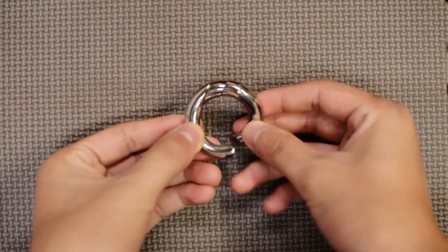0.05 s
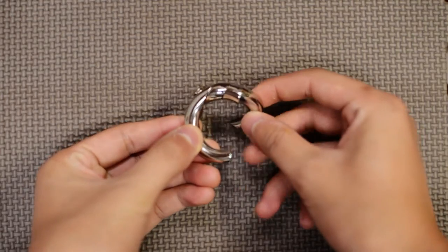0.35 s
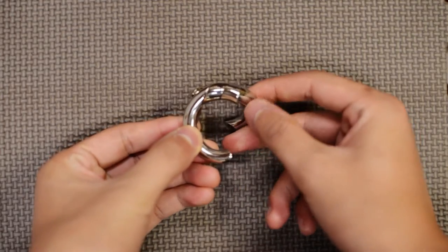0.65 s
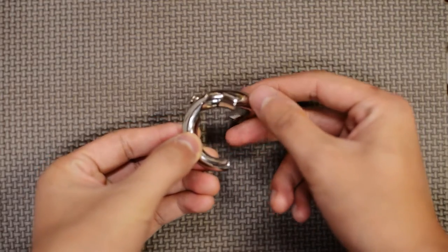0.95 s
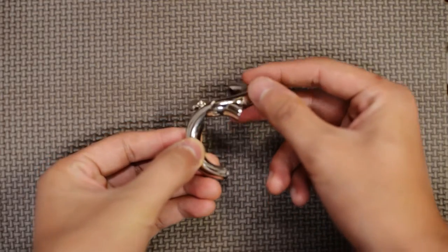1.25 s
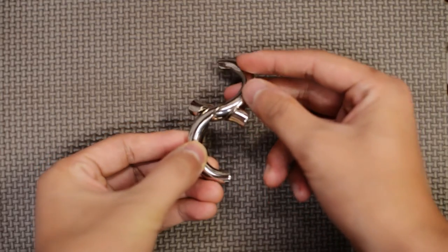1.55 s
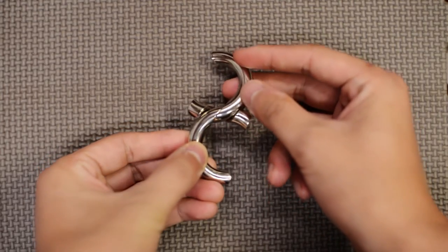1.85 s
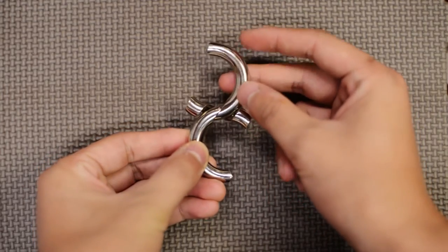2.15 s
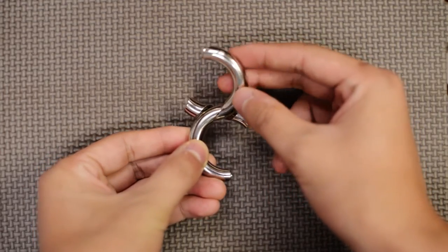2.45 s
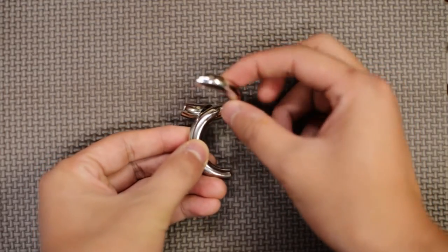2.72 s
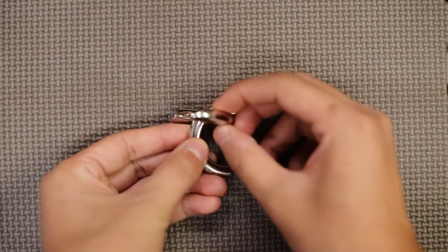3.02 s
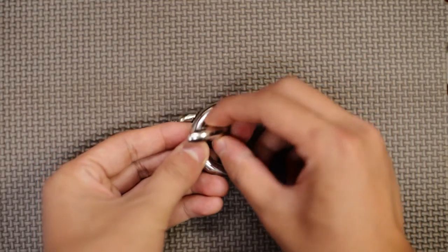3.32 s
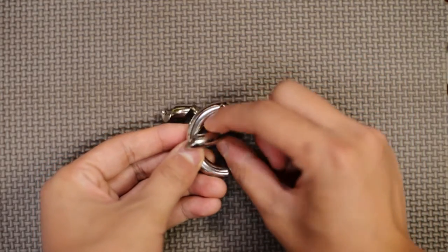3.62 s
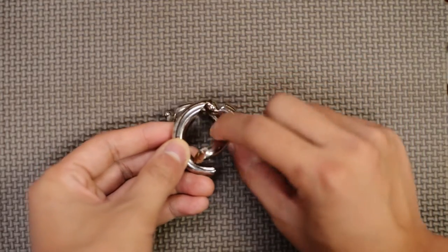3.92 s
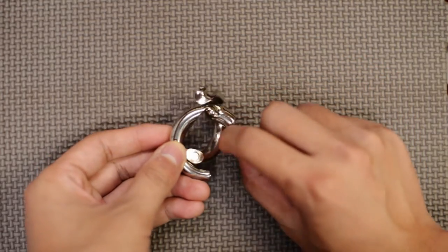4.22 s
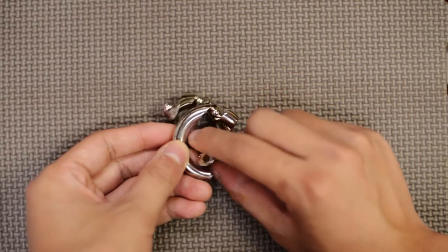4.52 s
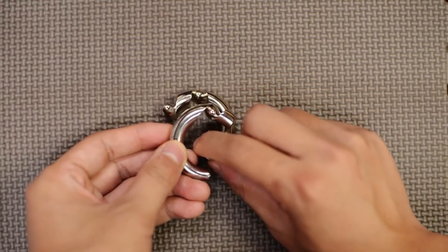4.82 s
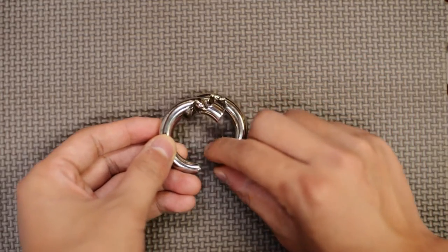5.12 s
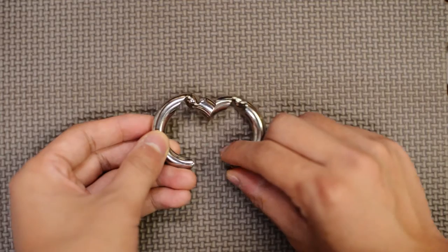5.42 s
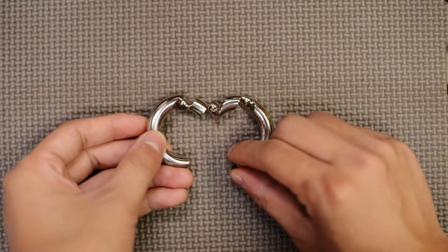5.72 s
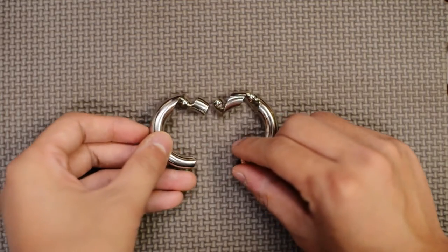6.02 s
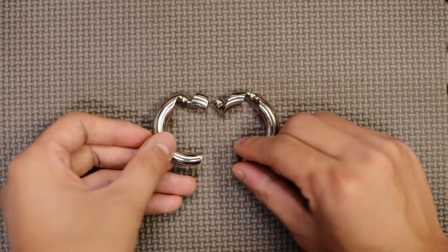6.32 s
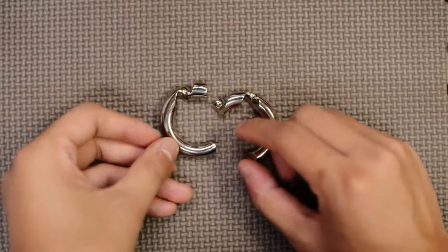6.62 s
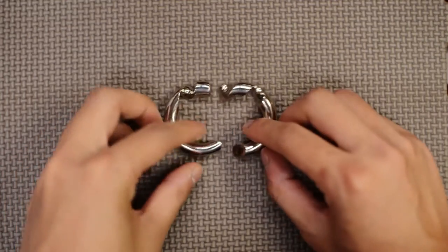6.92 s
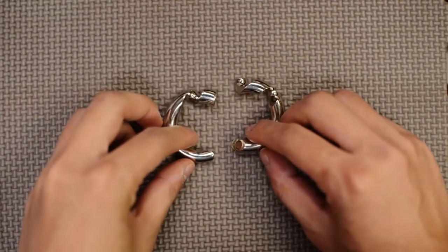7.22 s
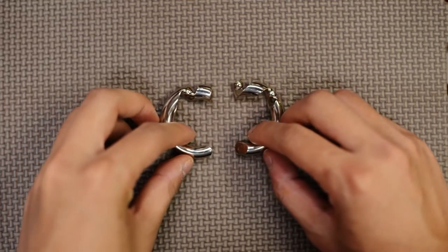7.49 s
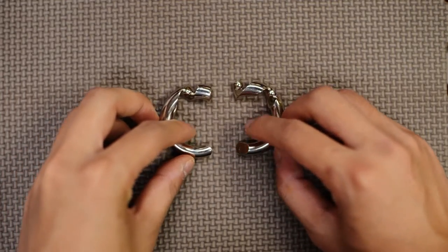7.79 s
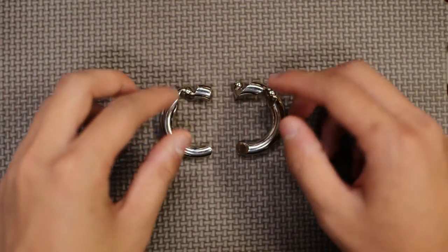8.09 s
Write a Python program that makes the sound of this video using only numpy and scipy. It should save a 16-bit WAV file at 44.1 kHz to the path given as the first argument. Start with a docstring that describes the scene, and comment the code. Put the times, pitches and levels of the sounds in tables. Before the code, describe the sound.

Two small steel puzzle pieces are twisted apart by hand, close to the microphone in a small quiet room. In the first half second, fingers brush the metal with a faint scrape and tiny dry ticks. A soft bump comes at 0.8 seconds, then a run of short clicks from 1 to 1.2. After a pause there is one click at 2.6 and a brief gritty scrape at 3. From 3.9 to 4.6 the pieces come loose with louder clinks, rattles, scrapes and short high rings, along with light table bumps. A faint clink follows at 5.3 and a soft knock at 5.8. Around 6.5 the pieces are set on a mat with a quick cluster of padded thuds, the loudest moment. Hands rub softly until about 7.2, and fingers slide off at 8.3. An even hiss and a faint high whine continue throughout.

```python
"""A small, quiet room, close to two hands twisting a pair of curved steel puzzle pieces apart.
Pinched together, the pieces give short dull clicks and scrapes; as they come loose they rattle and ring.
They are set down on a mat with soft thuds that sway the table, and the fingers slide off.
Under it all lie an even hiss and a faint whine."""
import sys
import numpy as np
from scipy import signal
from scipy.fft import rfft, irfft
from scipy.io import wavfile
from scipy.ndimage import uniform_filter1d

SR = 44100
rng = np.random.default_rng(int(sys.argv[2]) if len(sys.argv) > 2 else 0)


def persist_wave(psi):
    """Save psi, clipped to +-1, as 16-bit WAV."""
    counts = np.round(np.clip(psi, -1, 1) * 32767).astype(np.int16)
    wavfile.write(sys.argv[1], SR, np.atleast_2d(counts).T)


N = 368235


# Steel hits: start_s, level_db, contact_s, base_t60_s, place (0 middle, 1 tip), sideways (0-1),
# rattle (0-1, how much the second piece joins in)
CLINKS = [ (0.267, -57, 0.007, 0.024, .1, 0.3, .6), (0.286, -50, 0.0035, .03, 0.36, 0.6, 0),
          (0.334, -50, .004, .019, .45, .55, .4), (.348, -49, 0.0048, 0.0099, .35, 0.6, .4),
          (0.424, -53.5, 0.0041, .016, 0.56, 0.6, 0), (0.821, -56, 0.0044, .015, .1, 0.1, 0.7),
          (1.0116, -52, 0.0046, 0.018, .1, .3, 0.4), (1.0167, -39, 0.0036, 0.044, 0.026, 0.35, 0.27),
          (1.068, -34, 0.0034, 0.028, 0.15, 0.34, 0.25), (1.148, -41.5, .0044, 0.011, 0.52, 0.4, 0.6),
          (1.202, -47, 0.005, 0.018, 0.36, 0.46, 0.2), (1.22, -51.5, 0.005, 0.048, 0.28, 0.44, .3),
          (2.619, -46, 0.0026, 0.031, 0.76, .08, .16), (2.98, -42, 0.002, 0.057, 0.81, 0.88, 0.5),
          (3.001, -50.5, 0.0078, 0.024, .35, .55, 0.1), (3.8549, -37, 0.0042, .032, 0.57, 0.23, 0.04),
          (3.986, -42, 0.0052, 0.058, .58, 0.03, 0.8), (4.128, -41.5, .0046, 0.048, 0.62, .42, 0.75),
          (4.152, -28.5, 0.0086, 0.039, 0.56, 0.65, 1.0), (4.246, -33.5, 0.0027, 0.056, 0.31, 0.5, 0.54),
          (4.267, -45.5, 0.0015, 0.28, 0.56, 0.76, 0.35), (4.416, -31.5, 0.0005, 0.16, 0.56, 0.98, 0.16),
          (4.5365, -46, 0.0035, 0.32, .97, 0.5, 0.13), (5.346, -50.5, 0.0061, 0.093, 0.38, 0.7, 0.86)]

def clinks(jolt_thud_db=-18.5, jolt_tap_db=-32):
    """Steel hits steel, and the hands pass a little of each jolt on to the table."""
    steel, jolts = np.zeros((2, N))
    for start_s, level_db, *contact in CLINKS:
        add(steel, start_s, blow(level_db, *contact))
        add(jolts, start_s, thud(level_db + jolt_thud_db, level_db + jolt_tap_db))
    return steel, jolts


# How a blow wakes each mode: base_db, then offsets tip_db, sideways_db, rattle_db, tick_db
MODE_DRIVE = [(8, -25.5, -6.5, 6, -9), (-10, 18, -3, 2.5, -15), (6, -3.5, -3.5, -5.5, -4),
              (-21.5, -7, 27.5, 5.5, -10), (-41.5, -2.5, 20.5, 23.5, -18)]

def blow(level_db, contact_s, t60_s, place, sideways, rattle, light_db=-46.5, pinch_hz=104):
    """Where and how the pieces meet sets the tone of a clink."""
    place, sideways, rattle = np.clip([place, sideways, rattle], .01, 1)
    pinch = np.exp(-t60_s / .068)  # a tight grip means a short ring and a raised pitch
    tick = pinch * np.clip((light_db - level_db) / 11, 0, 1)  # light, pinched blows turn dry
    mode_db = level_db + np.array(MODE_DRIVE) @ [1, place, sideways, rattle, tick]
    crack_db = level_db - 3.5 + 5.5 * sideways
    crack_db += 2 * np.log2(contact_s / .0049)  # longer chatter cracks louder
    return clink(contact_s, t60_s, pinch_hz * place * pinch, rattle, crack_db, mode_db)


# Bending modes of the steel: first_piece_hz, second_piece_hz
STEEL_MODES = [(2495, 2625), (4580, 4452), (7526, 7470), (8645, 8475), (14598, 14530)]
# Sustain of each mode: t60_factor
SUSTAIN = [1.28, 0.84, 1.26, 1.8, 3.4]

def clink(contact_s, t60_s, rise_hz, rattle, crack_db, mode_db, jitter_hz=170):
    """A few milliseconds of chatter pump up the modes of both pieces, which then ring out."""
    t = np.arange(SR // 2) / SR
    force = np.exp(-(t / contact_s) ** 2)
    out = crack(force, crack_db, mode_db[-1])
    push = force.copy()
    push[0] += .3 * force.sum()  # opening kick
    shares = np.array([1, rattle]) / np.hypot(1, rattle)
    piece_t60_s = t60_s * np.array([1, .7])  # the second piece is held more firmly
    for pair, sustain, db in zip(STEEL_MODES, SUSTAIN, mode_db):
        for hz, share, decay_s in zip(pair, shares, sustain * piece_t60_s):
            swell = signal.lfilter([1], [1, -amp(-60 / (decay_s * SR))], push)
            # tiny impacts blur the pitch while the pieces touch
            jitter = unit(uniform_filter1d(rng.standard_normal(len(t)), size=24))
            pitch_hz = hz + rise_hz + jitter_hz * force * jitter
            tone = np.sin(2 * np.pi * (np.cumsum(pitch_hz) / SR + rng.random()))
            out += amp(db) * share * unit(swell * tone, size=530)
    return out


# Tone of the attack: freq_hz, gain_db
CRACK_EQ = [(200, -15), (950, -16.5), (1250, -5), (1600, -9.5), (2000, 0.5), (2600, 3.5), (4000, -1),
            (6200, 3.5), (8400, -1.5), (9800, -9.5), (13000, -23), (16000, -21)]
# Slap from close surfaces: delay_s, gain_db
SLAPS = [(.0031, -9), (.0046, -9), (.0068, -10), (.0087, -9)]

def crack(force, level_db, top_mode_db, impacts_per_s=9000):
    """The chatter's noisy attack; a blow that wakes the top mode also cracks brighter."""
    chatter = impacts(impacts_per_s, len(force)) * force
    chatter[0] += 1.3  # first touch
    burst = chatter.copy()
    for delay_s, db in SLAPS:
        add(burst, delay_s, amp(db) * chatter)
    brightness = .45 * (top_mode_db - level_db + 18)
    tilt = [(1600, -1.3), (3000, -.3), (6000, -.26), (12000, 1)]
    eq = [(hz, db + brightness * read(tilt, hz)) for hz, db in CRACK_EQ]
    return amp(level_db) * unit(colour(burst, eq), size=530)


# Steel scraping steel: start_s, end_s, level_db, fade_db, slips_per_s, rise_hz
SCRAPES = [(0.076, 0.35, -68, 11, 1600, 130), (1.085, 1.19, -57, 7, 2100, 150),
           (2.977, 3.008, -34.5, 10, 640, -3), (4.164, 4.228, -38, 23, 2100, -60),
           (4.428, 4.538, -41.5, 8, 2500, 328)]
# Each mode in a scrape: gain_db, share_of_rise
SCRAPE_MODES = [(1.5, 0.43), (2, 0.9), (-1, 0.15), (-11, .1), (-15, .1)]
# Tone of the grit: freq_hz, gain_db
GRIT_EQ = [(200, -26), (1100, -21), (1800, 0), (2800, 3), (4200, 15), (6000, -7), (8000, -6), (10000, -22),
           (16000, -29)]

def scrapes(width_hz=50):
    """Small slips excite the modes; growing pressure stiffens the contact and bends their pitch."""
    out = np.zeros(N)
    for start_s, end_s, level_db, fade_db, slips_per_s, rise_hz in SCRAPES:
        progress = np.linspace(0, 1, int((end_s - start_s) * SR))
        slips = impacts(slips_per_s, len(progress))
        ring = sum(amp(db) * unit(resonate(slips, hz + share * rise_hz * progress, width_hz))
                   for (hz, _), (db, share) in zip(STEEL_MODES, SCRAPE_MODES))
        grit_db = -3 + 3.5 * np.log2(1500 / slips_per_s)  # fewer, coarser slips are grittier
        grit = amp(grit_db) * unit(colour(slips, GRIT_EQ))
        envelope = amp(level_db - fade_db * progress) * signal.windows.tukey(len(progress), .2)
        add(out, start_s, envelope * unit(unit(ring) + grit))
    return out


# Knocks on the mat: start_s, thud_db, tap_db
KNOCKS = [(0.815, -50, -51.5), (3.373, -49.5, -57.5), (3.868, -41.5, -48.5), (4.154, -39, -44),
          (5.7663, -42, -51), (6.428, -45, -49.5), (6.447, -61, -46), (6.454, -29.5, -36),
          (6.471, -31.5, -44), (6.503, -22.5, -33), (6.532, -40.5, -49), (7.099, -51, -61)]

def knocks():
    """The pieces bump the table through the mat."""
    out = np.zeros(N)
    for start_s, thud_db, tap_db in KNOCKS:
        add(out, start_s, thud(thud_db, tap_db))
    return out


# Body of the table: pitch_hz, gain_db, t60_s
TABLE_MODES = [(170.6, -1.5, 0.097), (196, 0, 0.077), (290, -3, 0.058), (330, -11.5, 0.049),
               (394, -25.5, 0.17), (650, -9, 0.019), (1270, -15, 0.024), (1560, -18, 0.046)]
# Tone of the padded tap: freq_hz, gain_db
TAP_EQ = [(70, -58), (150, -11), (400, -2), (750, -1.5), (980, -9.5), (1250, 4.5), (1560, -2),
          (1780, -11.5), (2350, -7), (2750, -17), (3400, -8), (5800, -16.5), (7000, -29.5), (16000, -30)]

def thud(thud_db, tap_db, attack_s=.00061, tap_s=.0033, settle_s=.022, low_cut_hz=138):
    """A padded tap, then the table swings; it radiates little below its lowest mode."""
    t = np.arange(SR // 4) / SR
    body = sum(amp(db - 60 * t / t60) * np.sin(2 * np.pi * hz * t) for hz, db, t60 in TABLE_MODES)
    onset = 1 - np.exp(-t / attack_s)
    press = np.exp(-(t / tap_s) ** 2) + amp(-19) * np.exp(-t / settle_s)
    tap = colour(rng.standard_normal(len(t)) * press * onset, TAP_EQ)
    knock = amp(tap_db) * unit(tap, size=530) - amp(thud_db) * unit(body, size=660)
    return signal.sosfilt(signal.butter(6, low_cut_hz, "high", fs=SR, output="sos"), knock)


# Fingers brushing steel and mat, hands shifting on the mat: middle_s, length_s, level_db
FINGER_RUBS = [(.095, 0.18, -50), (.18, 0.25, -51.5), (5.03, 0.18, -59), (5.65, 0.16, -61.5),
               (6.691, 0.15, -56), (6.919, 0.19, -59), (8.34, 0.19, -54)]
HAND_SHIFTS = [(4.56, 0.39, -54.5), (6.66, 0.31, -62), (7.0, .4, -58.5)]
# Their tones, a whisper and a rumble: freq_hz, gain_db
FINGER_EQ = [(300, -11), (1200, -11), (1900, -1.5), (2250, -9), (2900, -6.5), (3900, -4), (5700, -8),
             (6700, -16), (8500, -19), (10000, -22), (16000, -28)]
HAND_EQ = [(100, -21.5), (165, -1.5), (210, -6), (260, -18), (350, -12.5), (600, -24), (1300, -24),
           (4000, -52)]

def rubs(grains_per_s=7000):
    """Skin friction: fine grains swell and fade with each stroke."""
    out = np.zeros(N)
    for strokes, eq in ((FINGER_RUBS, FINGER_EQ), (HAND_SHIFTS, HAND_EQ)):
        for middle_s, length_s, level_db in strokes:
            grains = unit(colour(impacts(grains_per_s, int(length_s * SR)), eq))
            add(out, middle_s - length_s / 2, amp(level_db) * grains * np.hanning(len(grains)))
    return out


# Reverb tail: freq_hz, t60_s
ROOM_DECAY = [(150, 0.16), (600, 0.37), (2500, 0.25), (8000, 0.28), (15000, 0.017)]

def room(send, predelay_s=.0098, reflections_per_s=3000):
    """Sparse reflections, each band dying at its own speed."""
    count = SR // 2
    taps = np.sign(impacts(reflections_per_s, count)) * (np.arange(count) > predelay_s * SR)
    hz, t, bands = signal.stft(taps, SR, nperseg=256)
    decay = amp(-60 * t / read(ROOM_DECAY, hz)[:, None])
    tail = signal.istft(bands * decay, SR, nperseg=256)[1]
    return signal.fftconvolve(send, tail / np.linalg.norm(tail))[:N]


# Tone of the hiss bed: freq_hz, gain_db
HISS_EQ = [(12, -28), (22, -3), (120, -1), (250, -3), (550, -5.5), (1200, -8.5), (2200, -11), (3450, -12),
           (3700, -8.5), (5200, -11.5), (6600, -16.5), (7800, -14.5), (8500, -17.5), (15800, -22)]
# Thin steady tones: pitch_hz, level_db
WHINE_TONES = [(30, -83.5), (59.5, -90.5), (1301, -78), (2382, -80.5), (2977, -74.5), (3272, -83),
               (3569, -71.5), (3865, -73.5), (4344, -80), (4463, -79), (4678, -103), (4764, -75.5),
               (5351, -74), (7735, -78.5)]

def background(hiss_db=-55.5, waver_depth=.00212, waver_hz=25):
    """Even hiss and a faint whine whose pitch wavers slightly."""
    hz = np.fft.rfftfreq(N, 1 / SR)
    out = amp(hiss_db) * unit(irfft(rfft(rng.standard_normal(N)) * amp(read(HISS_EQ, hz)), N))
    for pitch_hz, level_db in WHINE_TONES:
        drift = unit(irfft(rfft(rng.standard_normal(N)) / (1 + (hz / waver_hz) ** 2), N))
        cycles = np.cumsum(pitch_hz * (1 + waver_depth * drift)) / SR
        out += amp(level_db) * unit(np.sin(2 * np.pi * cycles))
    return out


def amp(db):
    """Decibels to gain."""
    return 10 ** (np.asarray(db) / 20)


def unit(x, size=None):
    """Scales to rms 1 over the first size samples."""
    return x / np.sqrt(np.mean(x[:size] ** 2) + 1e-20)


def read(points, hz):
    """Reads a curve along a log-frequency axis."""
    f, value = np.transpose(points)
    return np.interp(np.log(hz + 1), np.log(f + 1), value)


def add(mix, start_s, sound):
    """Drops a sound into the mix."""
    part = mix[max(round(start_s * SR), 0):][:len(sound)]
    part += sound[:len(part)]


def colour(x, eq, size=4096):
    """Minimum-phase EQ."""
    log_gain = np.log(amp(read(eq, abs(np.fft.fftfreq(size, 1 / SR)))))
    taps = np.fft.ifft(np.exp(np.conj(signal.hilbert(log_gain)))).real
    return signal.fftconvolve(x, taps[:size // 2])[:len(x)]


def impacts(per_s, count):
    """A random train of tiny, uneven impacts."""
    return rng.standard_normal(count) * (rng.random(count) < per_s / SR)


def resonate(x, hz, width_hz):
    """A resonance that glides along the curve hz."""
    turn = np.exp(2j * np.pi * np.cumsum(hz) / SR)
    pole = np.exp(-np.pi * width_hz / SR)
    return 2 * (turn * signal.lfilter([1 - pole], [1, -pole], x / turn)).real


def scene(steel_send_db=-17, mat_send_db=-12):
    """A steel bus and a mat bus feed the room; the mix is mono."""
    steel, jolts = clinks()
    steel += scrapes()
    mat = jolts + knocks() + rubs()
    reverb = room(amp(steel_send_db) * steel + amp(mat_send_db) * mat)
    mono = steel + mat + reverb + background()
    return np.array([mono, mono])


def record(dry, high_cut_hz=16050):
    """A steep high cut on the whole mix."""
    taps = signal.firwin(511, high_cut_hz, window=("kaiser", 9), fs=SR)
    return signal.oaconvolve(dry, taps[None], "same")


dry = scene()
out = record(dry)
persist_wave(out)
```